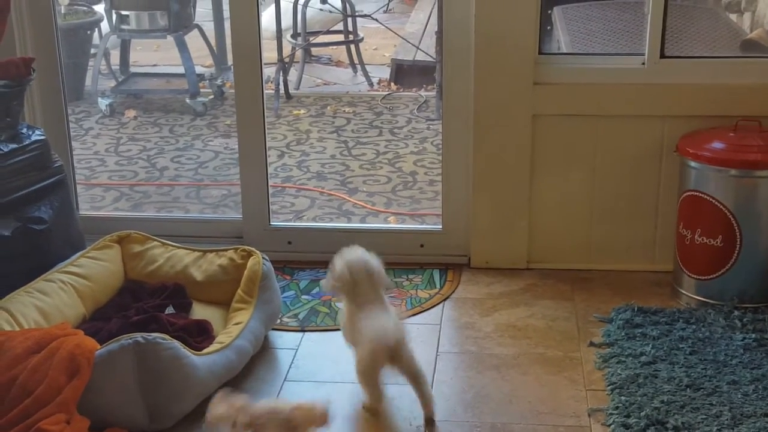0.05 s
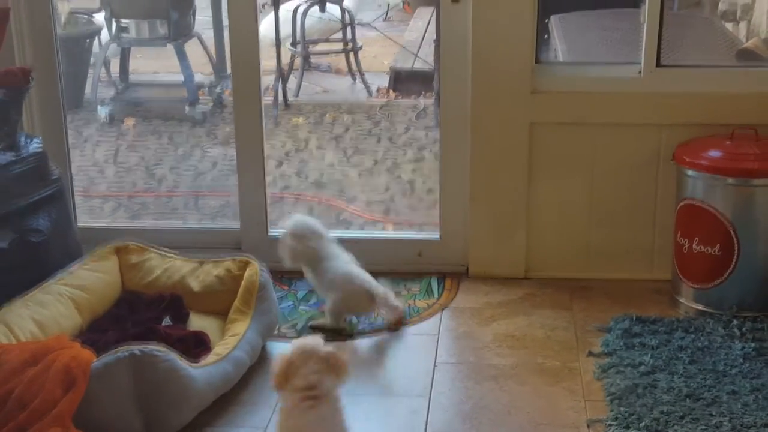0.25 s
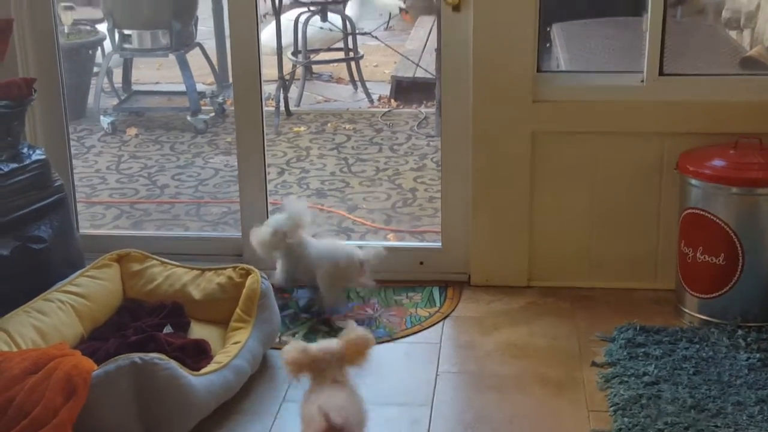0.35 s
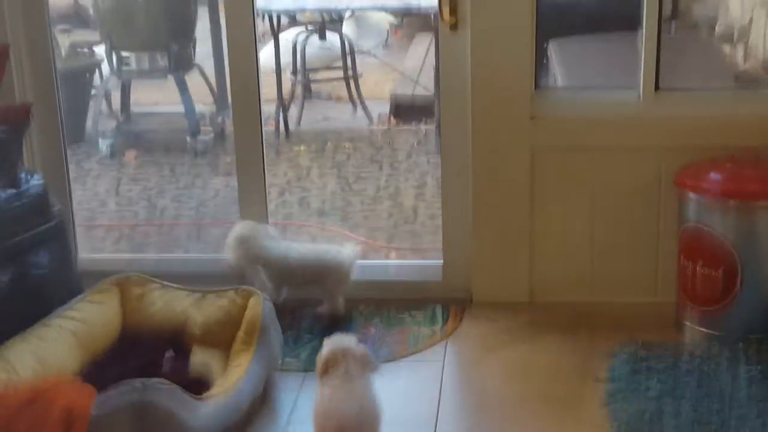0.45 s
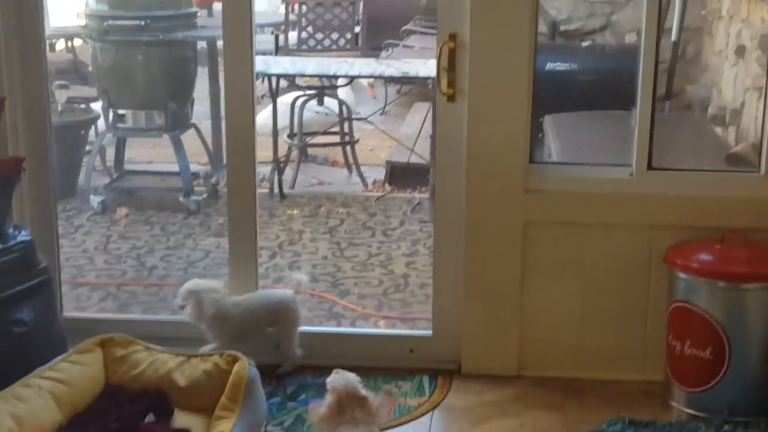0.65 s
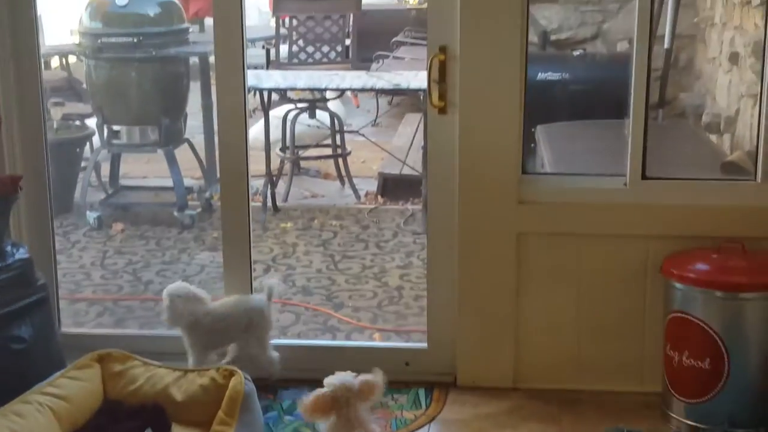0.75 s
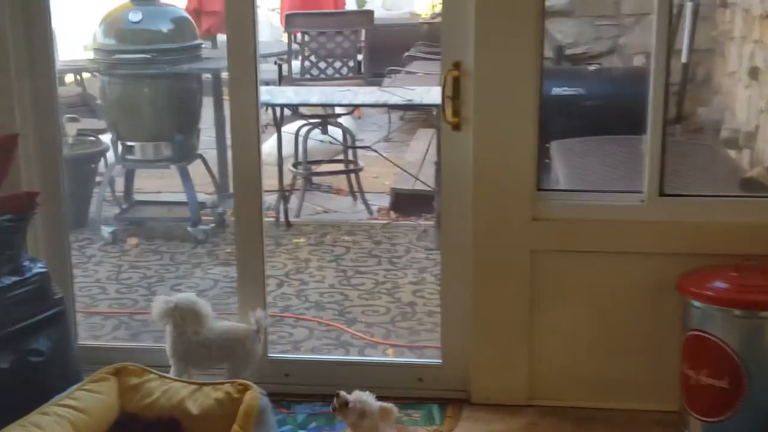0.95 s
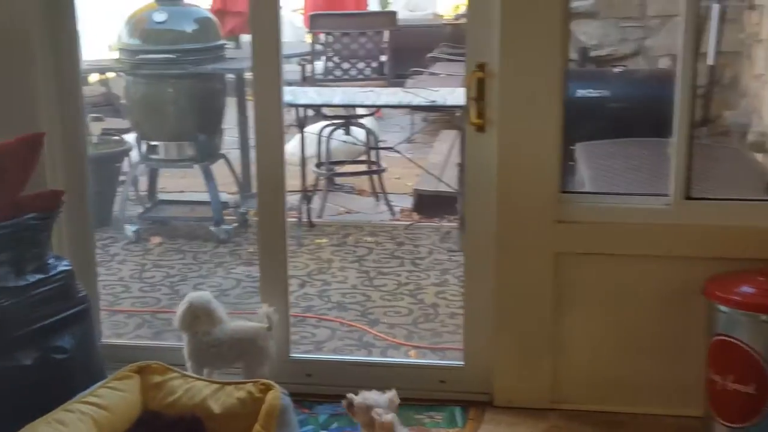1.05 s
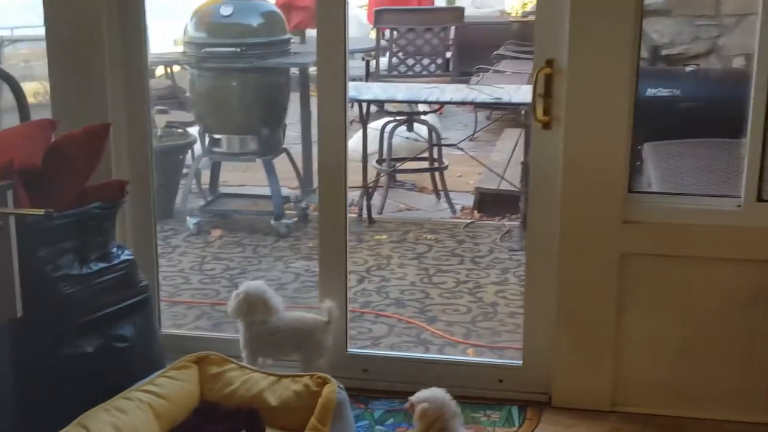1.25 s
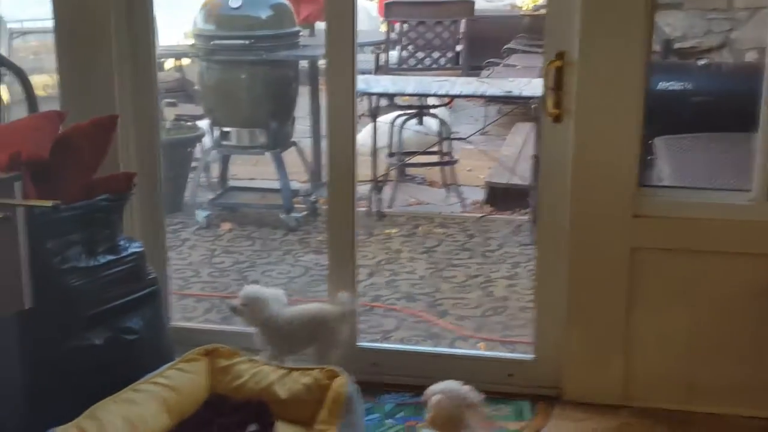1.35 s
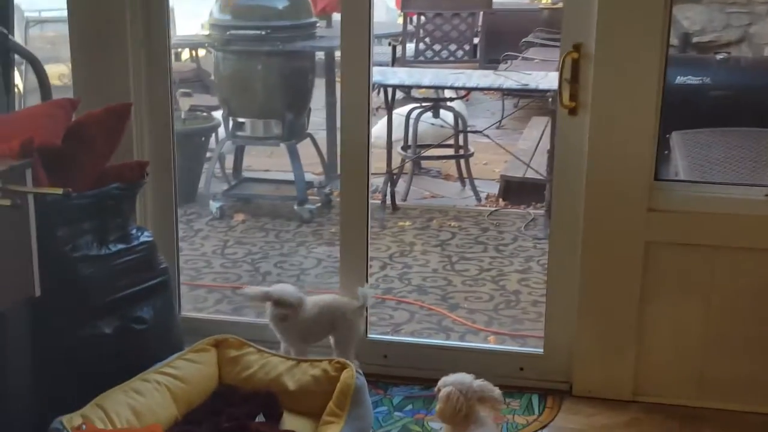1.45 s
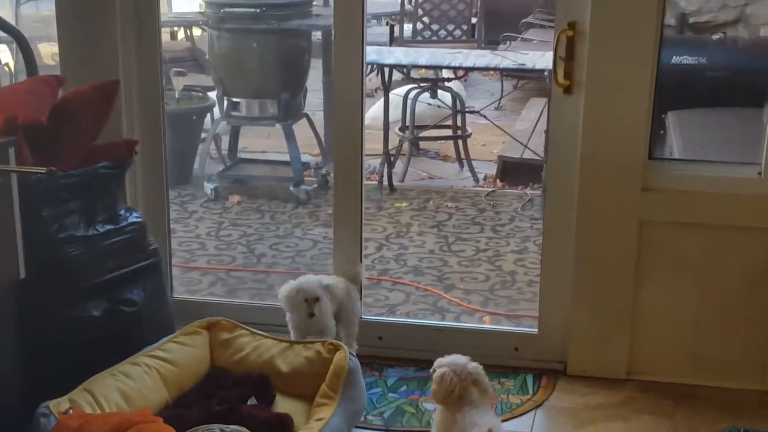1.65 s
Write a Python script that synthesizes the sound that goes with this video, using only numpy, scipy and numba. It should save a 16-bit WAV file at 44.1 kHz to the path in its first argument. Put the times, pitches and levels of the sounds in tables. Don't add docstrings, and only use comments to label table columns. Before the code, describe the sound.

A small dog yaps three times, sharp and high, in a hard tiled room with scuffing paws

```python
import sys
import numpy as np
from scipy import signal
from scipy.io import wavfile
from scipy.ndimage import uniform_filter1d, minimum_filter1d
from numba import njit

SR = 44100
rng = np.random.default_rng(int(sys.argv[2]) if len(sys.argv) > 2 else 0)


def volts_from_decibels(level):
    exponent = np.asarray(level, float) / 20
    return 10 ** exponent


def int16_out(signal):
    q = np.round(np.clip(np.atleast_2d(signal).T, -1, 1) * 32767)
    wavfile.write(sys.argv[1], SR, q.astype(np.int16))


N = 74970
T = np.arange(N) / SR
LEFT_RIGHT = np.array([[1], [-1]])

# start_s, pitch_hz, level_db, roughness_0_to_1, mouth_hz
LONG_YAP = [
    (0.2, 262, -73.5, 0.33, 715),
    (.203, 289.2, -38.5, 1.25, 790),
    (0.221, 395, -24.5, 0.92, 830),
    (0.243, 523.2, -6.5, 0.29, 1027),
    (0.257, 542.6, -11, 0.41, 1090),
    (0.288, 548.9, -11.5, .15, 1070),
    (0.304, 512.6, -12.5, 0.21, 1000),
    (0.348, 498.7, -18, 0.33, 1000),
    (0.402, 500, -24.5, 0.65, 876),
]
ARCHED_YAP = [
    (0.629, 200, -43, 0.68, 687),
    (.645, 440.4, -30, 0.81, 920),
    (0.661, 569.4, -13, 0.2, 1195),
    (0.676, 621, -8.5, 0.062, 1246),
    (0.7, 609, -14, 0.077, 1170),
    (.716, 680.5, -10.5, 0.28, 1310),
    (.726, 509.3, -13.5, 0.36, 1000),
    (.765, 409.8, -20, 0.2, 900),
    (0.797, 343.3, -19, 1, 780),
]
LAST_YAP = [
    (0.967, 211.9, -56, 0.67, 806),
    (.981, 379.2, -28, 0.69, 1130),
    (1.003, 585, -14, 0.2, 1224),
    (1.018, 622.4, -15, 0.47, 1210),
    (1.037, 674.3, -8.5, 0.15, 1250),
    (1.056, 510, -16, 0.041, 1136),
    (1.073, 491.8, -14, 0.095, 1005),
    (1.1, 389, -22.5, 0.62, 778),
    (1.136, 389.6, -20, 0.39, 720),
]
# odd_partials_db, second_hz, second_db, second_width_hz,
# third_hz, third_db, third_width_hz, jaws_open_s
THROATS = [
    (-12, 2228, -6, 1010, 2994, -8.5, 690, 0.2532),
    (-5, 2420, -17.5, 860, 3160, -12.5, 146, 0.61),
    (-2, 2180, -9.5, 170, 3270, -9, 110, 1.025),
]
YAP_PAN = [1.5, -1, -4.5]
# start_s, length_s, level_db, from_hz, to_hz, width_hz
PANT = (1.385, .12, -55, 2350, 3000, 700)
# start_s, rise_s,
# t60_s, level_db, # centre_hz
SCUFFS = [(0, 0.013, 0.61, -52.5, 70.4), (0, 0.023, 0.51, -50.5, 194), (.03, 0.02, 0.27, -50.5, 2470),
          (.198, 0.0046, 0.17, -44.5, 1660), (.198, 0.0031, 1.1, -47.5, 5200), (.21, 0.042, 0.14, -46, 257),
          (.44, 0.042, .4, -71, 59), (.27, 0.048, 0.76, -45.5, 4400), (.6, 0.052, 0.17, -45, 273),
          (.38, 0.022, 1.1, -47, 313), (.975, 0.0085, 0.1, -44.5, 1845), (.5, 0.015, 0.14, -42.5, 145),
          (.545, 0.026, 1.5, -40, 640), (.575, 0.017, 0.4, -39.5, 1370), (1.2, 0.032, 1.8, -68.5, 58.8),
          (1.39, 0.0097, 1.4, -66.5, 4460), (1.47, 0.043, 0.29, -56, 1636), (1.56, 0.022, 0.64, -58, 2380)]
# start_s, peak_db, ring_hz, t60_s, pan_db
CLAW_TICKS = [(0.0115, -68, 1570, 0.0046, 40.5), (0.0228, -74, 9000, 0.0044, -7.5),
              (0.0504, -30.5, 8500, 0.0086, 10), (.1545, -45, 13400, 0.012, 12.5),
              (1.3385, -35, 9300, 0.007, 12), (1.339, -35, 11000, 0.005, 10), (1.3399, -48, 276, 0.038, 1),
              (1.338, -48, 5270, 0.0074, 11), (1.3381, -57, 7300, 0.017, 9), (1.339, -53, 14000, .006, 7),
              (1.4021, -49.5, 5400, 0.0069, -11), (1.5532, -42, 1400, 0.0084, 2),
              (1.582, -52, 1440, 0.0096, -29.5)]
# start_s, rise_s, t60_s, level_db, centre_hz
CLOTH = [
    (.012, 0.0054, 0.74, -49, 11000),
    (.04, 0.0029, 0.28, -39.5, 11600),
    (.15, 0.012, 0.58, -55, 13400),
    (.22, 0.039, 1, -47, 8100),
    (.4, 0.078, 0.2, -47, 11000),
    (.92, 0.0095, 0.26, -69, 11000),
    (1.56, 0.036, 0.94, -60.5, 8300),
]
# centre_hz, t60_s, likeness_of_ports_0_to_1
ROOM_FADE = [(200, 0.6, 0.7), (500, 0.35, 0.5), (1000, 0.43, 0.14), (1824, 0.44, 0.12), (4100, 0.18, 0),
             (9000, 0.16, 0)]
# delay_s, level_db, pan_db
ECHOES = [
    (.0031, -17.5, 25.5),
    (.0074, -11.5, -6),
    (0.014, -19, 23.5),
    (.021, -10.5, -1.5),
]
# ring_hz, level_db, t60_s, pan_db
STANDING_TONES = [(1233, -63.5, 0.58, 2), (1995, -56, 0.53, 7.5), (2048, -57.5, 0.55, 9),
                  (2170, -52.5, 0.23, 2.5), (2944, -59, 0.33, 4.5), (3195, -66.5, 0.64, 3.5),
                  (875, -61, 0.65, -0.5), (1023, -57.5, 0.43, -3.5)]
# centre_hz, level_db_per_hz
HOUSE_COLOUR = [(21, -33), (35, -1), (159, -7.5), (252, -5), (466, -8), (1330, -1.5), (3710, -27),
                (9340, -24), (16000, -24.5)]
# time_s, level_db
HOUSE_LEVEL = [(0, -56.5), (.1, -53.5), (.19, -65.5), (.6, -55), (1.2, -54), (1.7, -57.5)]

JITTER, SHIMMER_DB, BREATH_DB = 0.05, 6, 1
JAW_SHUT_DB, JAW_RISE_S = -9, 0.012
MOUTH_WIDTH_HZ = 645
EFFORT_SECOND, EFFORT_THIRD = 1, 0.24
LIPS_LOW_HZ, LIPS_HIGH_HZ = 573, 3510
CHEST_DB, CHEST_HZ, CHEST_T60_S = 3, 307, 0.092
RASP_DB, RASP_HZ, RASP_WIDTH_HZ = -43.5, 5120, 1500
AIR_DB, AIR_HZ = -51.5, 6000
FADE_S = 0.012
SCUFF_SHARPNESS, CLOTH_SHARPNESS, GRAIN_DB = 1.47, 0.4, 2
CLOTH_PAN_DB = 6
TICK_RISE_S = 0.00023
ROOM_DB, ROOM_GAP_S, ROOM_HOLD_S = 3.5, 0.006, 0.041
TREBLE_LEAN_DB = 0.76
PORT_DIP, PORT_DIP_HZ, PORT_DIP_WIDTH_HZ = 0.27, 11000, 1900
TOP_HZ = 15850


def unit(x):
    return x / np.sqrt(np.mean(x ** 2))


def pan(x, db):
    return x * volts_from_decibels(np.array([[db / 2], [-db / 2]]))


@njit
def resonator(x, hz, width):
    y, swing, rest = np.empty(len(x)), 0., 0.
    for i in range(len(x)):
        g, damping = np.tan(np.pi * hz[i] / SR), width / hz[i]
        v = (swing + g * (x[i] - rest)) / (1 + g * (g + damping))
        swing = 2 * v - swing
        rest = rest + 2 * g * v
        y[i] = damping * v
    return y


def band(x, hz, width):
    centre = np.clip(hz + 0. * x, 20, .45 * SR)
    return resonator(x + 1e-18, centre, 1. * width)


def band_twice(x, hz, width):
    return band(band(x, hz, width), hz, width)


def noise():
    return rng.standard_normal(N)


def walk(rate):
    k = int(SR / rate)
    return unit(uniform_filter1d(uniform_filter1d(noise(), k), k))


def yap(rows, throat):
    s, hz, db, rough, mouth = np.array(rows).T
    odd_db, second_hz, second_db, second_width, third_hz, third_db, third_width, open_s = throat

    def smooth(values):
        return uniform_filter1d(np.interp(T, s, values), size=180)

    rough, level = np.clip(smooth(rough), 0, 1), smooth(db)
    phase = 2 * np.pi * np.cumsum(smooth(hz) * (1 + JITTER * rough * walk(305))) / SR
    voice = sum(np.sin(k * phase) * volts_from_decibels(odd_db * (k % 2)) for k in range(1, 16))
    voice = voice * volts_from_decibels(SHIMMER_DB * rough * walk(200))
    breath = noise() * (1 + np.cos(phase)) * volts_from_decibels(BREATH_DB) * 4
    source = np.sqrt(1 - rough ** 2) * voice + rough * breath

    jaw = volts_from_decibels(JAW_SHUT_DB * np.clip((open_s - T) / JAW_RISE_S, 0, 1))
    effort = level - db.max()
    first = band_twice(source, smooth(mouth), MOUTH_WIDTH_HZ)
    second = volts_from_decibels(second_db + EFFORT_SECOND * effort) * band_twice(source, second_hz, second_width)
    third = volts_from_decibels(third_db + EFFORT_THIRD * effort) * band_twice(source, third_hz, third_width)
    lips = signal.butter(4, [LIPS_LOW_HZ, LIPS_HIGH_HZ], "bandpass", fs=SR, output="sos")
    out = signal.sosfilt(lips, first - jaw * second + jaw * third)

    chest_fade = volts_from_decibels(CHEST_DB - 60 * np.maximum(T - s[0], 0) / CHEST_T60_S)
    out = out + chest_fade * band_twice(source, CHEST_HZ, 270)
    out = out + volts_from_decibels(RASP_DB) * band_twice(source, RASP_HZ, RASP_WIDTH_HZ)
    out = out + volts_from_decibels(AIR_DB) * band(breath, AIR_HZ, 7000)
    return out * volts_from_decibels(level) * (T > s[0]) * np.clip((s[-1] - T) / FADE_S, 0, 1)


def pant():
    s, length, db, from_hz, to_hz, width = PANT
    u = np.clip((T - s) / length, 0, 1)
    hz = from_hz + (to_hz - from_hz) * np.sqrt(u)
    return volts_from_decibels(db) * np.sin(np.pi * u) * unit(band_twice(noise(), hz, width))


def puffs(rows, sharpness):
    out = np.zeros((2, N))
    for s, rise, t60, db, hz in rows:
        u = np.maximum(T - s, 0)
        swell = np.minimum(u / rise, 1) ** 2 * volts_from_decibels(db - 60 * np.maximum(u - rise, 0) / t60)
        grain = volts_from_decibels(GRAIN_DB * walk(300))
        mid, side = (unit(band_twice(noise(), hz, hz / sharpness)) for _ in range(2))
        spread = min(.12 + hz / 1300, .9)
        out += swell * grain * (mid + spread * side * LEFT_RIGHT)
    return out


def claws():
    out = np.zeros((2, N))
    for s, db, hz, t60, pan_db in CLAW_TICKS:
        u = np.maximum(T - s, 0)
        ring = np.sin(2 * np.pi * hz * u) * np.minimum(u / TICK_RISE_S, 1)
        out += pan(ring * volts_from_decibels(db - 60 * u / t60), pan_db)
    return out


def room(x):
    u = T[:SR]
    a, b = rng.standard_normal((2, SR))
    tail = 0
    for hz, t60, like in ROOM_FADE:
        mid, side = (band_twice(c, hz, hz) for c in (a, b))
        pair = np.sqrt(1 + like) * mid + np.sqrt(1 - like) * side * LEFT_RIGHT
        lean_db = TREBLE_LEAN_DB * max(np.log2(hz / 1000), 0)
        tail = tail + pan(pair, lean_db) * volts_from_decibels(-60 * np.maximum(u - ROOM_HOLD_S, 0) / t60)
    tail = tail * np.minimum(u / ROOM_GAP_S, 1) ** 2 * volts_from_decibels(ROOM_DB - 34)
    for s, db, pan_db in ECHOES:
        tail += pan(np.sinc((u - s) * SR) * volts_from_decibels(db), pan_db)
    for hz, db, t60, pan_db in STANDING_TONES:
        tail += pan(np.sin(2 * np.pi * hz * u) * volts_from_decibels(db - 60 * u / t60), pan_db)
    return signal.fftconvolve(x, tail, axes=1)[:, :N]


def house():
    out = 0
    colour_hz, colour_db = np.array(HOUSE_COLOUR).T
    for hz in 40 * 2 ** np.arange(0, 8.8, .5):
        mid, side = (band(noise(), hz, hz / 3) for _ in range(2))
        db = np.interp(np.log(hz), np.log(colour_hz), colour_db) + 0.58 * walk(4.8)
        out = out + volts_from_decibels(db) * (mid + min(0.1 + hz / 2000, 1) * side * LEFT_RIGHT)
    return unit(out) * volts_from_decibels(np.interp(T, *np.array(HOUSE_LEVEL).T))


def scene():
    yaps = [yap(rows, throat) for rows, throat in zip((LONG_YAP, ARCHED_YAP, LAST_YAP), THROATS)]
    paws = puffs(SCUFFS, SCUFF_SHARPNESS) + pant()
    wet = room(sum(yaps) + 0.42 * paws)
    near = claws() + pan(puffs(CLOTH, CLOTH_SHARPNESS), CLOTH_PAN_DB) + house()
    direct = sum(pan(v, pan_db) for v, pan_db in zip(yaps, YAP_PAN))
    return direct + wet + paws + near


def roll_off(x):
    return signal.sosfilt(signal.butter(12, 16520, fs=SR, output="sos"), x)


def record(dry):
    dip = np.array([band(c, PORT_DIP_HZ, PORT_DIP_WIDTH_HZ) for c in dry])
    x = dry - PORT_DIP * dip
    gain = np.minimum(1, .9 / (np.abs(x).max(axis=0) + 1e-9))
    x = x * uniform_filter1d(minimum_filter1d(gain, size=400), size=200)
    x = signal.sosfilt(signal.ellip(8, .2, 60, TOP_HZ, fs=SR, output="sos"), x)
    return roll_off(x)


dry = scene()
out = record(dry)
int16_out(out)
```